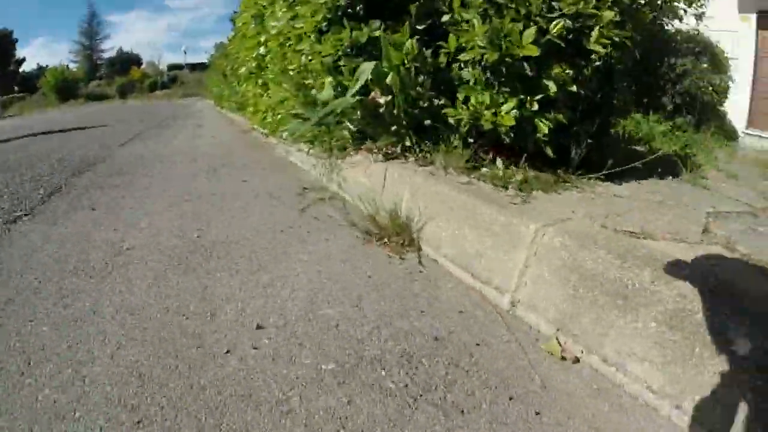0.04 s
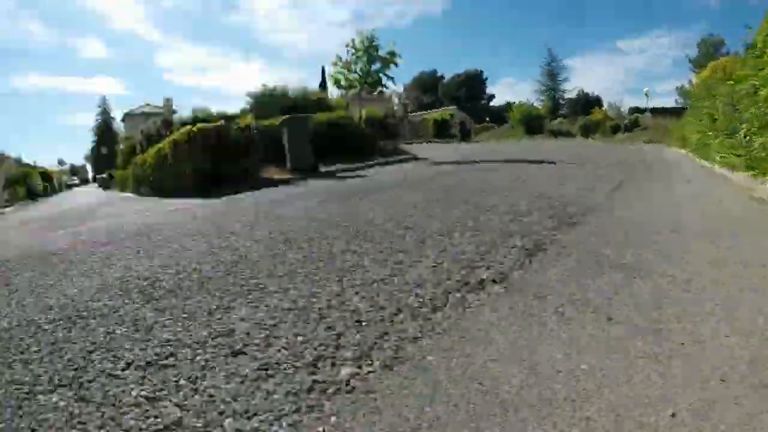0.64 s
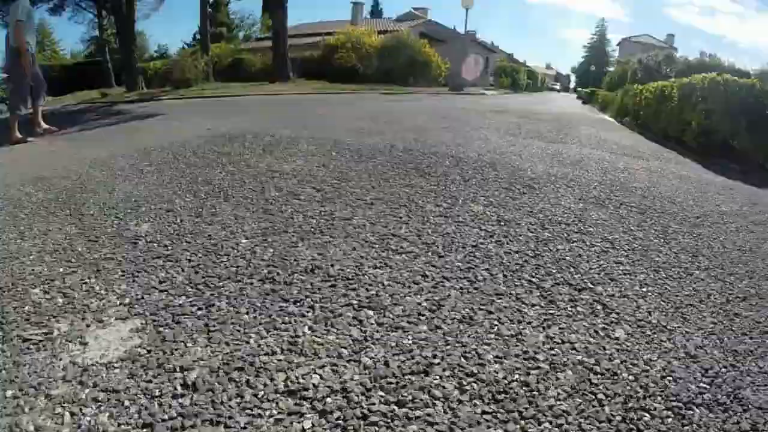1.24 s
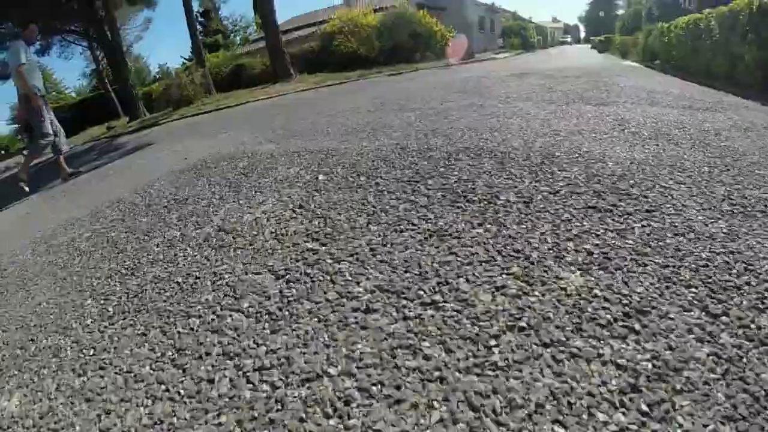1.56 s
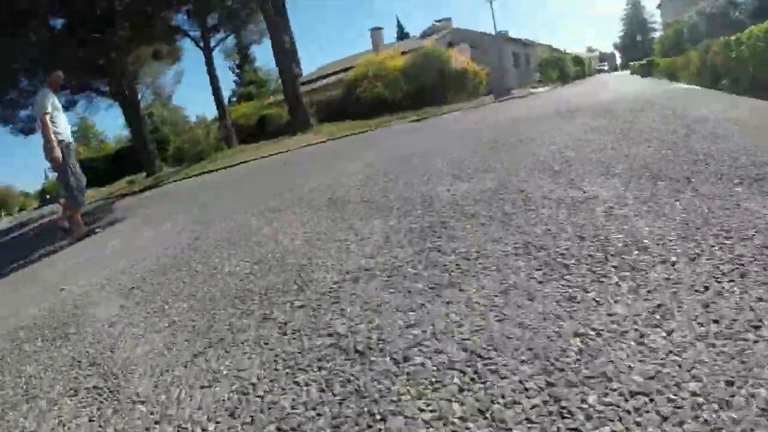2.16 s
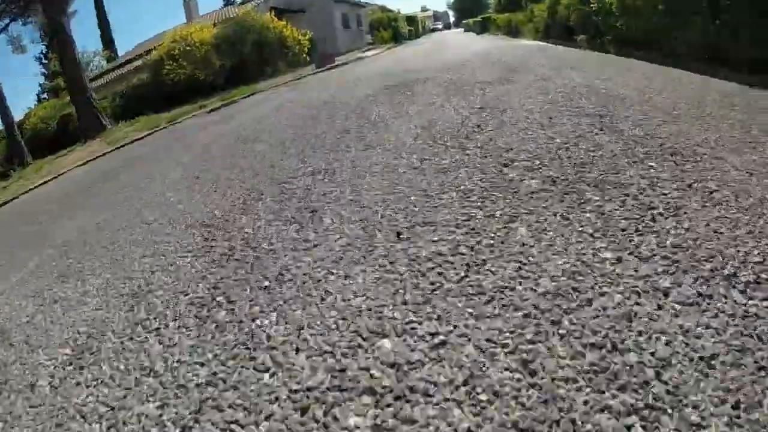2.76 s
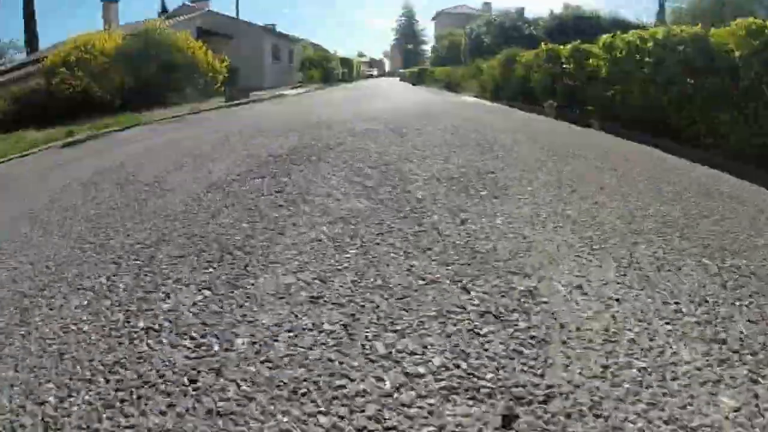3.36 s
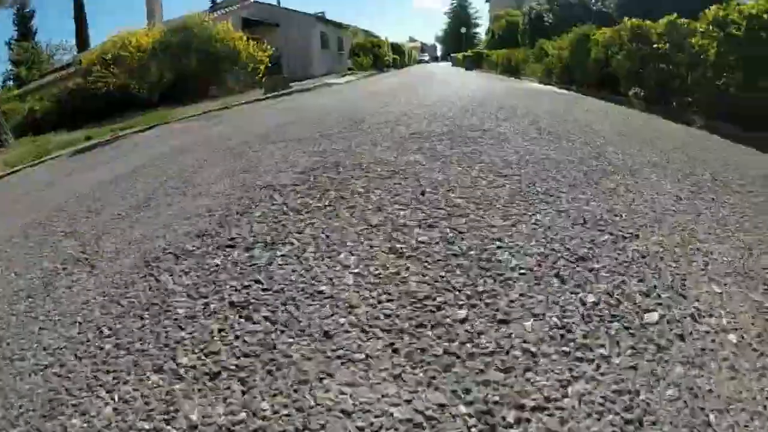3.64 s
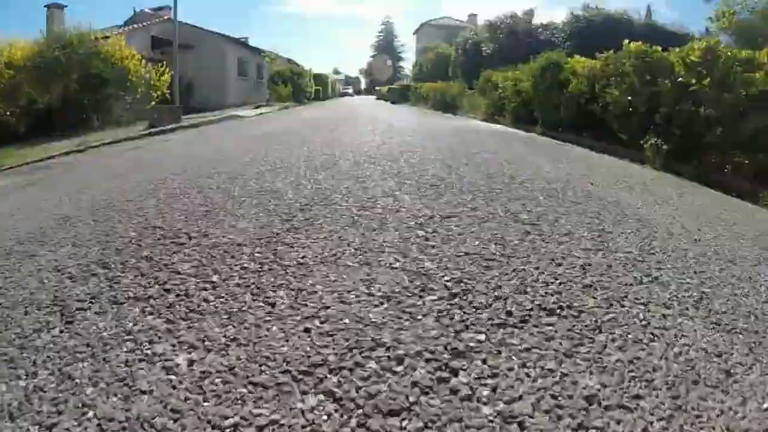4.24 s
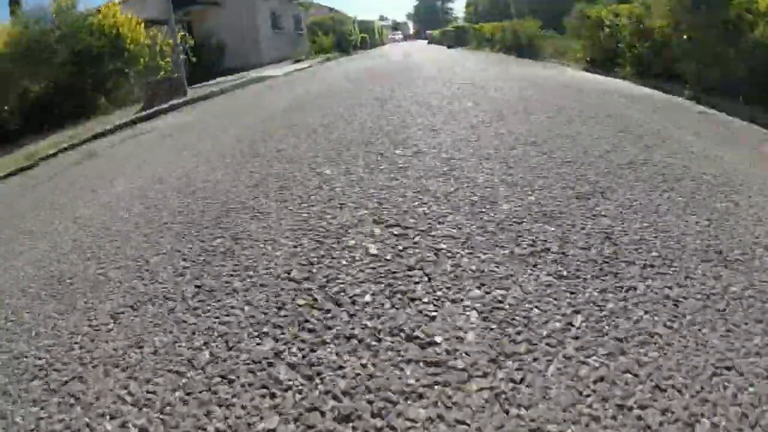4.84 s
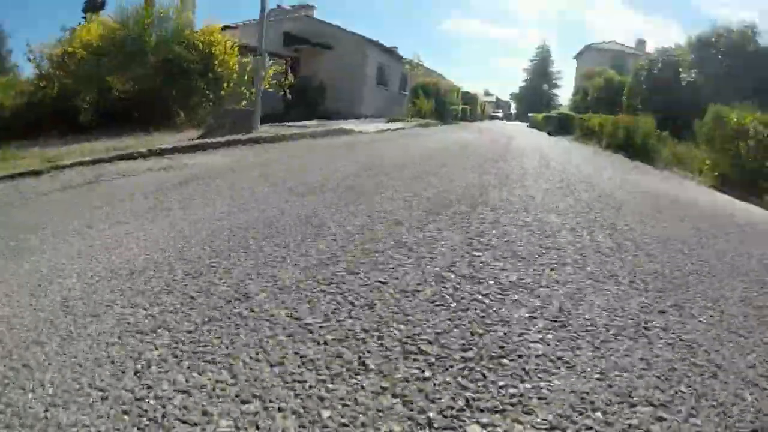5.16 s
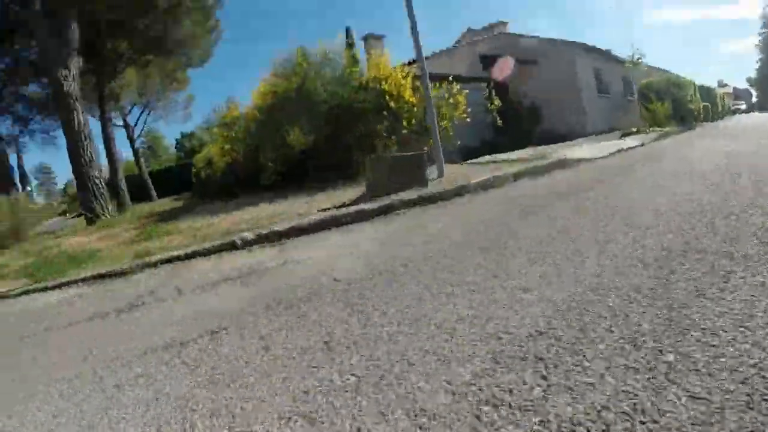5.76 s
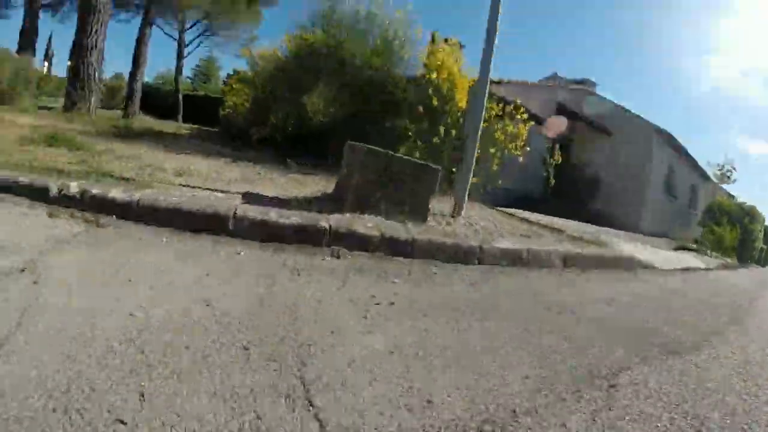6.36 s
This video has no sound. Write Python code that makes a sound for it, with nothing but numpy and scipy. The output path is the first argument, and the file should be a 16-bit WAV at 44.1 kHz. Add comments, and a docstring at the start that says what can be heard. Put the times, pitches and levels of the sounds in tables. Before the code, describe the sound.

Close, boxy rubbing and irregular hollow knocks come from a camera case swinging at a dog's neck, with the microphone inside it. Soft low jolts mark the footfalls, loose at first and then about four a second, each just after a faint tick of claws on the road. The rubbing grows somewhat stronger through the trot, and the heaviest thump comes near the end. The outdoor air is only a faint hiss.

```python
"""Trotting dog, heard from its collar.

An asphalt lane, on the one microphone of a small camera that hangs from the dog's collar.
At each step the claws tick on the road just below; a moment later the weight lands and jolts the camera.
Right at the microphone, the plastic case slides over strap and fur about twice a step and knocks
on its mount. Underneath lie the sway of the collar and a faint outdoor hiss."""
import sys
import numpy as np
from scipy import signal
from scipy.fft import rfft, irfft, next_fast_len
from scipy.io import wavfile
from scipy.ndimage import uniform_filter1d, map_coordinates

SR = 44100
rng = np.random.default_rng(int(sys.argv[2]) if len(sys.argv) > 2 else 0)


def generate_wav(signal):
    """Clip the signal to [-1, 1] and save it as 16-bit WAV at the path in sys.argv[1]."""
    frames = np.transpose(np.atleast_2d(signal))
    scaled = np.clip(frames, -1, 1) * 32767
    pcm = np.round(scaled).astype(np.int16)
    wavfile.write(sys.argv[1], SR, pcm)


N = 287091

# The paws coming down. Each row: claw touch in seconds, relative tick level in dB, jolt level in dB.
FOOTFALLS = [(.022, -57, -45), (0.149, -72, -19), (0.403, -47, -26.5), (.639, -56, -32), (.93, -66, -25),
             (1.318, -52, -56), (1.37, -49.5, -32), (1.606, -59, -43), (1.883, -44.5, -24.5),
             (2.123, -43.5, -20.5), (2.369, -54, -24.5), (2.611, -43.5, -20), (2.834, -50, -17),
             (3.063, -45, -21), (3.287, -46.5, -18.5), (3.508, -42.5, -18.5), (3.751, -45.5, -23),
             (3.982, -47.5, -22.5), (4.215, -45.5, -17), (4.448, -45.5, -18.5), (4.688, -49, -15.5),
             (4.926, -45, -16), (5.163, -44.5, -31.5), (5.386, -47.5, -21), (5.64, -48, -40),
             (5.874, -47, -9), (6.1, -45.5, -23.5), (6.395, -52, -24)]
# The low drone of the case's body. Each row: frequency in Hz, relative level in dB.
BODY_SPECTRUM = [(40, -23.5), (90, -5.5), (140, -1.5), (250, 1), (340, -4.5), (460, -4.5), (700, -4),
                 (1000, -16.5), (2000, -51), (5000, -75)]
# Claws and grit on asphalt. Each row: frequency in Hz, relative level in dB.
TICK_SPECTRUM = [(1000, -5), (2500, 3.5), (4000, -8.5), (5300, 3.5), (7000, -1), (8600, -5), (9600, -8.5),
                 (11500, -12.5), (15000, -25)]


def case_rubbing():
    """Hairs and webbing slip on the case: coarse slips make the body drone, finer ones scrape and hiss."""
    # Slides over strap and fur. Each row: peak in seconds, scrape level in dB,
    # length at half power in seconds, drone in dB over the scrape.
    strokes = [(0.03, -46, 0.054, -3), (0.179, -49, 0.052, -22), (0.268, -41.5, 0.039, 4),
               (0.41, -47, 0.098, -1), (0.531, -38.5, 0.11, -1), (0.73, -48, 0.107, 1),
               (0.846, -39.5, 0.076, 2), (1.033, -41.5, 0.11, 4.5), (1.202, -50, 0.067, 1),
               (1.331, -49, 0.066, 0), (1.451, -49.5, 0.037, 7.5), (1.71, -48.5, 0.056, 2.5),
               (1.85, -48.5, 0.019, 2), (1.987, -47, 0.057, 0.5), (2.208, -44.5, 0.018, 1),
               (2.271, -43.5, 0.059, -8), (2.33, -50, 0.031, 7), (2.459, -47.5, 0.054, 5),
               (2.563, -38, 0.012, 3), (2.634, -45, 0.02, 7), (2.701, -42.5, 0.048, 6.5),
               (2.812, -41.5, 0.053, 0), (2.93, -44.5, 0.038, 4), (3.023, -41.5, 0.017, -5),
               (3.083, -41, 0.045, 3), (3.148, -37.5, 0.025, 0), (3.258, -42, 0.037, -2),
               (3.382, -40.5, 0.035, -0.5), (3.489, -35.5, 0.035, 0.5), (3.595, -42.5, 0.052, 3),
               (3.704, -40.5, 0.065, 0.5), (3.845, -44, 0.042, 2), (3.96, -38.5, 0.034, 2.5),
               (4.062, -41, 0.035, 3.5), (4.197, -43, 0.062, 2.5), (4.29, -41.5, 0.021, 1),
               (4.335, -34.0, 0.029, 1), (4.43, -40, 0.052, 2.5), (4.545, -42, 0.075, 2),
               (4.663, -41, 0.076, -1.5), (4.811, -34.0, 0.032, -0.5), (4.909, -40, 0.067, 5.5),
               (5.016, -41.5, 0.052, 3), (5.121, -38, 0.052, -6.5), (5.28, -46.5, 0.061, -12),
               (5.348, -40.5, 0.029, 4), (5.404, -41.5, 0.017, 5), (5.485, -45.5, 0.038, -4),
               (5.587, -47, 0.13, -2.5), (5.734, -51, 0.051, 2), (5.804, -44.0, 0.035, 2.5),
               (5.895, -47.0, 0.056, 7), (5.974, -37.5, 0.035, 2.5), (6.06, -45.5, 0.079, 0),
               (6.116, -44.5, 0.033, 5), (6.199, -45, 0.033, 4), (6.339, -40, 0.021, 4),
               (6.468, -42.5, 0.04, 2)]
    # Faint rubbing between strokes. Each row: time in seconds, scrape level in dB.
    creep = [(0, -68), (.6, -63), (1.3, -69), (1.9, -56.5), (2.5, -54), (3.3, -52.5), (4.2, -54.5),
             (5.1, -49.5), (5.7, -54.5), (6.25, -57.5), (6.5, -49)]
    # The hiss, brightest in the steady trot. Each row: time in seconds, level in dB against the scrape.
    hiss_level = [(0, -17), (.5, -11), (1.1, -13.5), (2.4, -12), (3.1, -10.5), (5, -7.5), (5.4, -15.5),
                  (6.5, -10.5)]
    # The colours of scrape and hiss. Each row: frequency in Hz, relative level in dB.
    scrape_spectrum = [(300, -23.5), (700, 1), (1050, 3.5), (1500, 1.5), (2000, -1.5), (2800, 2),
                       (3400, -10.5), (4500, -24), (6000, -24), (8000, -45), (15000, -51)]
    hiss_spectrum = [(1500, -22), (2400, 0.5), (3000, 10.5), (3600, 2), (5200, -2.5), (6200, -10),
                     (7500, -28), (10500, -26), (15000, -43)]
    rise_share, squareness = 0.56, 2.67  # part of a stroke spent swelling; above 2, flatter than a bell
    t = np.arange(N) / SR
    creep_db = curve(creep) + 3.3 * wobble(30)
    power = amp([creep_db, creep_db + 6.5]) ** 2  # scrape, drone
    for peak_s, db, length_s, drone_db in strokes:
        near = slice(max(int((peak_s - 3 * length_s) * SR), 0), int((peak_s + 3 * length_s) * SR))
        lag = t[near] - peak_s
        flank_s = length_s * np.where(lag < 0, rise_share, 1 - rise_share)
        swell = 0.5 ** (np.abs(lag / flank_s) ** squareness)
        power[:, near] += amp([[db], [db + drone_db]]) ** 2 * swell
    # The strap catches and lets go many times within one stroke.
    force, drone_force = np.sqrt(power) * amp(1.42 * wobble(170))
    scrape = through_case(force * slips(per_second=4000, spread_db=5.5, patchy_db=2), scrape_spectrum)
    drone = through_case(drone_force * slips(per_second=2000, spread_db=6, patchy_db=1), BODY_SPECTRUM)
    hiss = through_case(force * slips(per_second=9000, spread_db=6.5, patchy_db=4), hiss_spectrum)
    return scrape + drone + amp(curve(hiss_level)) * hiss


def mount_knocks():
    """A padded bump rings the mounted case, never twice at quite the same pitch, with a short dull thud."""
    # Hard contacts favour the upper modes.
    # Each row: start in seconds, relative level in dB, brightness in dB per octave.
    bumps = [(.062, -31.5, 0), (.243, -27.5, -6), (.275, -25.5, 0), (.509, -14.5, -5), (0.568, -26.5, 0),
             (0.984, -24.5, -12), (1.093, -26, 11), (1.207, -29, -1), (1.541, -31.5, 4), (1.972, -24.5, -3),
             (2.086, -28, 7), (2.143, -25, 24), (2.18, -26.5, -10), (2.223, -22.5, 7.5), (2.246, -27, -8),
             (2.708, -22, -10), (2.937, -20, -6), (2.964, -22.5, -10), (3.119, -22, -14), (3.375, -22, 0),
             (3.532, -23.5, -1), (3.822, -21, -22), (4.342, -17.5, -9), (4.417, -18, -4), (4.445, -25, -12),
             (4.543, -27, -8), (4.635, -18.5, -3.5), (4.823, -23, -9), (4.894, -19, -14), (4.983, -23, -5),
             (5.075, -20, -4), (5.179, -20, 9), (5.204, -19, 11.5), (5.224, -18.5, -7.5), (5.46, -21, -1.5),
             (5.795, -21.5, -6), (5.953, -15.5, 4), (6.162, -29, 0), (6.282, -28.5, 0), (6.325, -42, -2),
             (6.338, -20.5, -10), (6.494, -19, -12)]
    # Modes of the case on its mount. Each row: pitch in Hz, relative level in dB, seconds to fall 60 dB.
    mount_modes = [(208, -1, 0.052), (449, -4, 0.019), (690, -15.5, 0.023)]
    hz, mode_db, t60 = np.transpose(mount_modes)[:, :, None]
    t = np.arange(SR // 6) / SR
    attack = 1 - np.exp(-t / 0.00087)
    rings, thuds = np.zeros(N), np.zeros(N)
    for start_s, db, brightness in bumps:
        share = amp(mode_db + brightness * np.log2(hz / hz[0]))
        share /= np.linalg.norm(share)
        detuned_hz = hz * (1 + rng.normal(0, 0.024))
        modes = share * amp(-60 * t / t60) * np.sin(2 * np.pi * detuned_hz * t)
        add(rings, start_s, -amp(db) * attack * modes.sum(axis=0))
        add(thuds, start_s, amp(db - 60 * t / 0.012) * rng.standard_normal(len(t)))
    return amp(-1) * rings + amp(-11.5) * through_case(thuds, BODY_SPECTRUM)


def step_jolts():
    """Each landing pushes the air in the case one way, then pulls it back, with a soft thud."""
    # The colour of the thud. Each row: frequency in Hz, relative level in dB.
    thud_spectrum = [(20, -13), (45, 8.5), (80, -2.5), (130, -6.5), (220, -19.5), (600, -30.5), (2000, -61),
                     (5000, -120)]
    landing_delay_s = 0.1063  # the weight follows the claws
    t = np.arange(N) / SR
    shove, shake = np.zeros(N), np.zeros(N)
    for touch_s, _, db in FOOTFALLS:
        push_to_pull_s = 0.027 * 0.5 ** ((db + 18.5) / 21)  # harder jolts are quicker
        swing = 2 * (t - touch_s - landing_delay_s) / push_to_pull_s
        shove -= amp(db) * swing * np.exp((1 - swing ** 2) / 2)
        shake += amp(db) * np.exp(-swing ** 2 / 4)
    return shove + amp(-16) * shake * through_case(rng.standard_normal(N), thud_spectrum)


def claw_ticks():
    """Claws strike the road milliseconds apart, each with a short ring, and briefly scratch the grit."""
    t = np.arange(SR // 25) / SR
    ticks = np.zeros(N)
    for touch_s, db, _ in FOOTFALLS:
        add(ticks, touch_s - 0.005, amp(db - 16) * scuff(SR // 60))
        early_s, late_s = rng.uniform(0.00075, 0.004), rng.uniform(0.001, 0.0055)
        for offset_s, claw_db in [(0, 0), (-early_s, -9), (late_s, -4)]:
            crack = amp(-60 * t / 0.0078) * rng.standard_normal(len(t))
            ring = amp(-5 - 60 * t / 0.0061) * np.sin(2 * np.pi * rng.uniform(4230, 8880) * t)
            add(ticks, touch_s + offset_s, amp(db + claw_db) * (crack + ring))
    return amp(5.5) * through_case(ticks, TICK_SPECTRUM)


def collar_sway():
    """The swinging collar puts a deep rumble under the steps."""
    # The strength of the sway. Each row: time in seconds, level in dB.
    sway_level = [(0, -42.5), (.5, -33), (1.3, -38.5), (1.8, -34.5), (2.3, -32), (3.5, -34), (5.5, -32),
                  (6, -27.5), (6.5, -29.5)]
    # Its colour. Each row: frequency in Hz, relative level in dB.
    rumble_spectrum = [(4, -11.5), (10, -2), (18, -2.5), (30, -11), (50, -16.5), (90, -33.5), (200, -46),
                       (600, -88)]
    return amp(curve(sway_level)) * unit(through_case(rng.standard_normal(N), rumble_spectrum))


def loose_grit(per_second=2.3):
    """Now and then a trailing paw scuffs a crumb of grit."""
    crumbs = np.zeros(N)
    for when, softness in rng.random((int(per_second * N / SR), 2)):
        add(crumbs, when * N / SR, amp(-60 - 9.2 * softness) * scuff(SR // 70))
    return through_case(crumbs, TICK_SPECTRUM)


def outdoor_air():
    """Faint air and restless fur, muffled by the case."""
    # The background hiss. Each row: frequency in Hz, relative level in dB.
    air_spectrum = [(60, 6.5), (200, 3.5), (500, 5), (2500, -1), (4000, -14), (7000, -18), (10500, -24),
                    (13500, -28), (15000, -32)]
    return amp(-53.5 + 0.44 * wobble(9)) * through_case(rng.standard_normal(N), air_spectrum)


def through_case(sound, spectrum):
    """Colour a sound by a spectrum and by the ringing case, as a causal filter of unit energy."""
    # Resonances and notches of the case. Each row: centre in Hz, width in Hz, lift in dB.
    resonances = [(206, 74, 9.5), (763, 89, 3.5), (859, 230, -7.5), (1050, 130, 1), (1330, 120, 1),
                  (1817, 45, -8.5), (1835, 26, 11), (2162, 210, 6), (2690, 67, -5.5), (2843, 83, 0),
                  (2975, 96, 6.5), (3240, 120, -3), (3470, 150, 4.5), (3620, 340, -4.5), (4037, 254, 8.5),
                  (4400, 250, -1.5), (4806, 310, 7.5), (7200, 130, 3), (7900, 430, -3)]
    size = 2 * next_fast_len(N // 2 + 8192)
    hz = np.fft.rfftfreq(size, 1 / SR)
    point_hz, point_db = np.transpose(spectrum)
    db = np.interp(np.log(hz + 1), np.log(point_hz), point_db)
    db += sum(lift / (1 + (2 * (hz - centre) / width) ** 2) for centre, width, lift in resonances)
    # Minimum phase: the ringing comes after the hit.
    cepstrum = irfft(np.log(unit(amp(db))))
    cepstrum[1:size // 2] *= 2
    cepstrum[size // 2 + 1:] = 0
    return irfft(rfft(sound, size) * np.exp(rfft(cepstrum)), size)[:N]


def slips(per_second, spread_db, patchy_db):
    """Tiny random stick-slip releases, rms 1; as the contact shifts, patches of pitch come and go."""
    happens = rng.random(N) < per_second / SR
    releases = happens * rng.choice([-1, 1], N) * amp(spread_db * rng.uniform(-0.62, 1, N))
    bands = signal.stft(releases, nperseg=512)[2]
    patches = uniform_filter1d(rng.standard_normal(bands.shape), size=5, axis=0)  # across pitch
    patches = uniform_filter1d(patches, size=6, axis=1)  # across time
    return unit(signal.istft(bands * amp(patchy_db * unit(patches)), nperseg=512)[1][:N])


def scuff(samples):
    """A soft-edged burst of noise."""
    return np.hanning(samples) * rng.standard_normal(samples)


def wobble(rate):
    """A smooth random curve, rate knots a second."""
    return map_coordinates(rng.standard_normal(int(N * rate / SR) + 4), [np.arange(N) * rate / SR])


def curve(rows):
    """(seconds, value) points joined by straight lines, one value per sample."""
    return np.interp(np.arange(N) / SR, *np.transpose(rows))


def add(track, start_s, sound):
    """Mix a sound into the track."""
    start = max(round(start_s * SR), 0)
    part = track[start:start + len(sound)]
    part += sound[:len(part)]


def amp(db):
    """Decibels to gain."""
    return 10 ** (np.asarray(db) / 20)


def unit(x):
    """Scaled to rms 1."""
    return x / np.sqrt(np.mean(x ** 2) + 1e-20)


def scene():
    """All that reaches the one microphone at the dog's neck."""
    on_collar = case_rubbing() + step_jolts() + collar_sway() + mount_knocks()
    return (on_collar + claw_ticks() + loose_grit() + outdoor_air())[None]


def record(dry):
    """The camera keeps nothing above its band limit."""
    top_hz = 15400
    size = next_fast_len(N + SR // 2)
    in_band = np.fft.rfftfreq(size, 1 / SR) < top_hz
    return irfft(rfft(dry, size) * in_band, size)[..., :N]


dry = scene()
out = record(dry)
generate_wav(out)
```